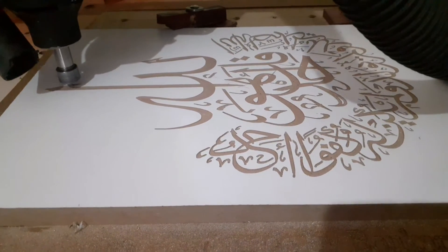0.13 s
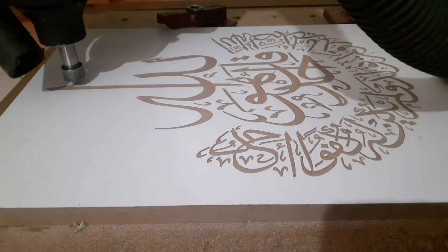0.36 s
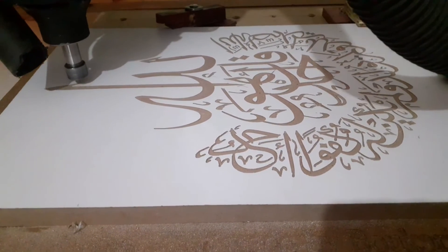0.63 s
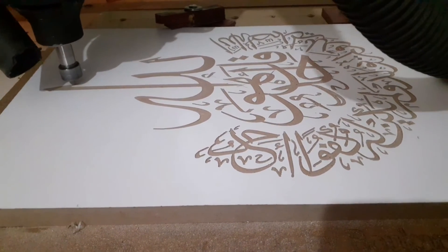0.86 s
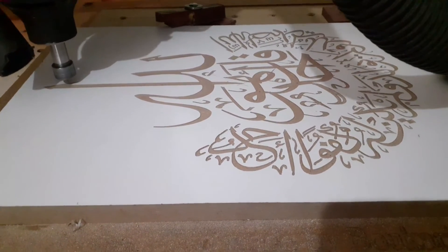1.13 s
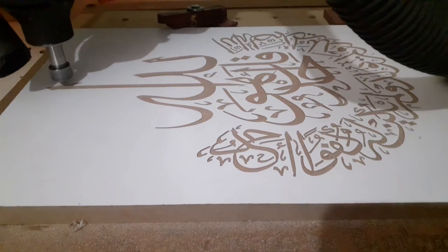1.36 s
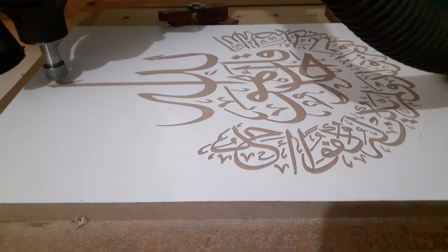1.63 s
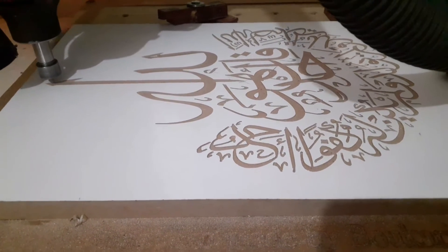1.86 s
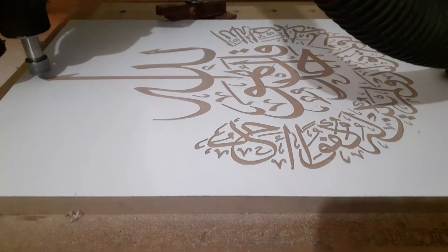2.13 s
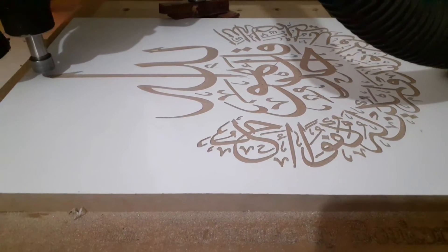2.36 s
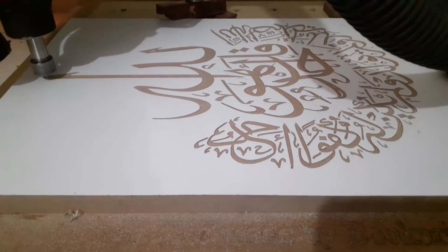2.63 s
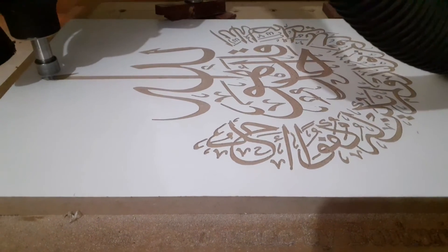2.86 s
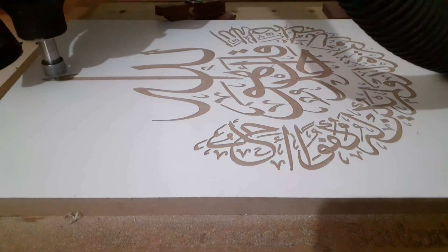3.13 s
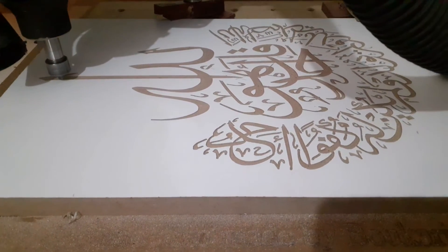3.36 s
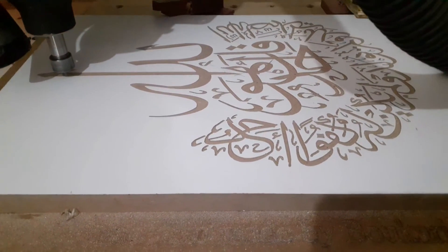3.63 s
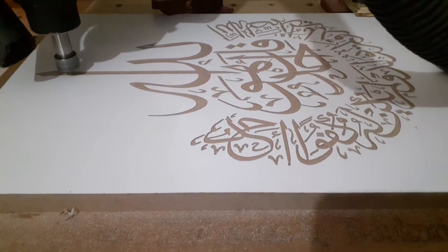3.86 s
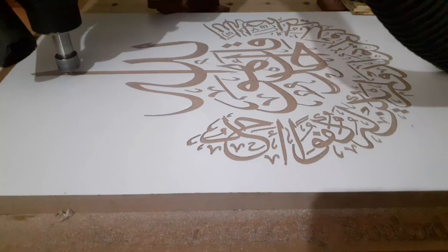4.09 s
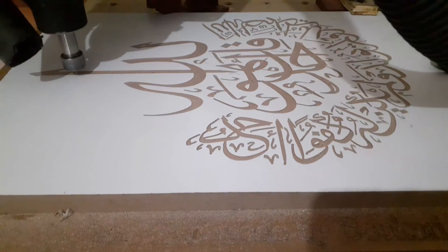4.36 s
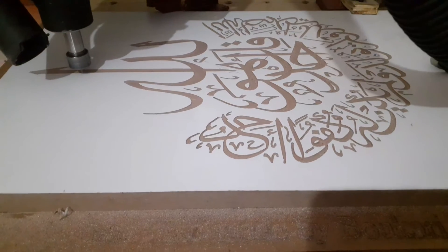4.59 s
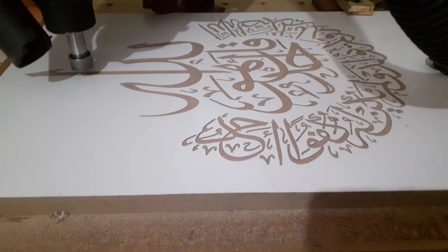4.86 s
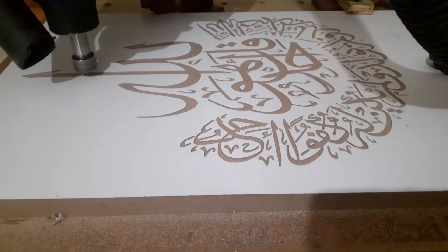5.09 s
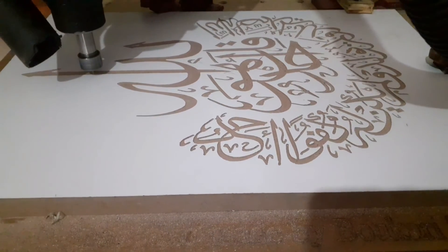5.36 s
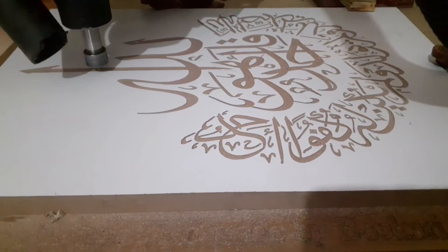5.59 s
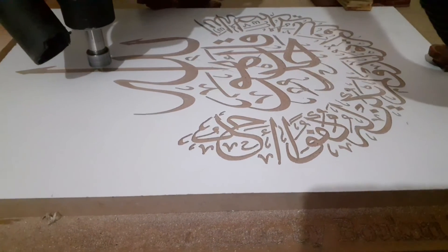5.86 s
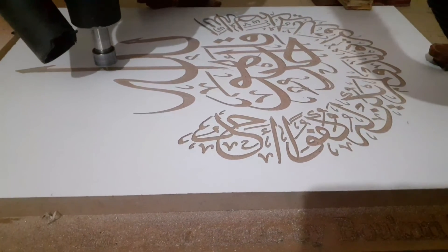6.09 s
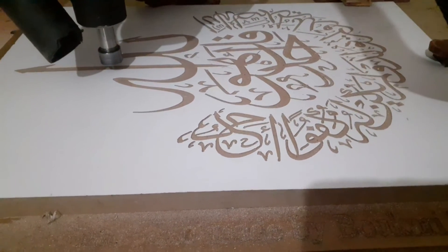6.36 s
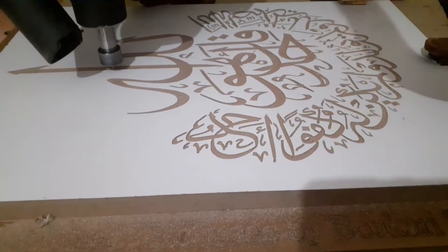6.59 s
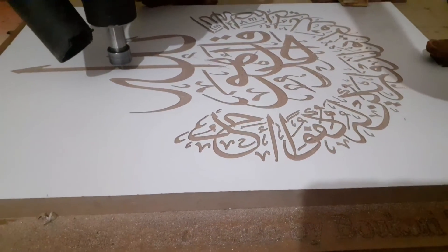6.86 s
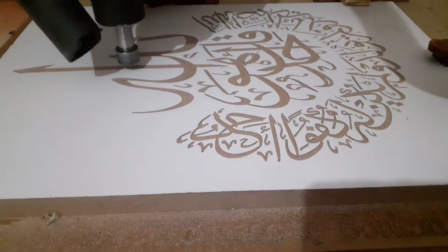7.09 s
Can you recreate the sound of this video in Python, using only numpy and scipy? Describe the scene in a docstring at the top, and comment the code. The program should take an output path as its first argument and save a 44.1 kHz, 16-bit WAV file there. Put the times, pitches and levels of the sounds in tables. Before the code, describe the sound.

Continuous workshop machine noise: a router motor's buzzing whine bends at corners while a vacuum's bright airflow and shrill motor tone never let up.

```python
"""A router cuts a wooden board in a small workshop while a dust extractor whines and rushes throughout.
In the first second the feed changes stroke often and the bit rounds two corners, bending the pitch of the cut.
Just after two seconds come two more corners and a short axis-motor hum; the router is fastest near 3.4 s,
then slows through longer strokes. Motors are sums of sines locked to shafts and bearings; air and hiss are
coloured noise. Two microphones a few centimetres apart hear it, the left one shaded in the treble."""
import sys
import numpy as np
from scipy import signal
from scipy.fft import rfft, irfft, next_fast_len
from scipy.io import wavfile
from scipy.ndimage import uniform_filter1d

SR = 44100
rng = np.random.default_rng(int(sys.argv[2]) if len(sys.argv) > 2 else 0)


def unload_audio(sound):
    """Save the sound as a 16-bit wav file, at the path given as the first command line argument."""
    columns = np.transpose(np.atleast_2d(sound))
    # keep every value between -1 and 1, then stretch to whole-number steps
    steps = np.round(np.clip(columns, -1, 1) * 32767)
    wavfile.write(sys.argv[1], SR, steps.astype(np.int16))


def to_linear_factor(level_db):
    """Convert decibel levels (scalar or array-like) to linear amplitude factors."""
    exponent = np.asarray(level_db, float) / 20
    return 10 ** exponent


N = 318402
STEP = 50  # samples between values of a slow control

# Slow drifts: the airflow follows the carriage, and the left of the hiss slowly rises and falls; each column is
# used only as a swing about its own mean. # Each row: time in seconds, left-right balance of the hiss in dB,
# airflow level in dB.
SLOW_DRIFTS = [(0, -7.5, -26.5), (2.5, -8, -26), (4, -7.5, -26), (5.5, -10, -25.5), (7.22, -9, -26)]
# Sharp corners, where the contact point runs round the bit and it digs in.
# Each row: middle in seconds, length in seconds, shift of the cutting rate in Hz, dB added to the first order.
CORNER_CUTS = [(0.157, 0.31, -4, -1), (0.595, 0.15, 4.5, 7), (2.188, 0.11, 4, -4), (2.274, 0.1, -3.5, 7)]


def in_time(rows):
    """Columns of a table, joined by straight lines, one value a sample."""
    s, *columns = np.transpose(rows)
    return [np.interp(np.arange(N) / SR, s, c) for c in columns]


def slow_chance(rate_hz):
    """Noise through two equal one-pole low-passes, scaled to spread 1; one value every STEP samples."""
    pole = np.exp(-2 * np.pi * STEP * rate_hz / SR)
    noise = rng.standard_normal(N // STEP + 1501)
    slow = signal.lfilter([1], [1, -2 * pole, pole * pole], noise)[1500:]  # drop the filter's run-in
    return slow / slow.std()


def fill_in(slow):
    """From one value every STEP samples to one a sample, held."""
    return np.repeat(slow, STEP, axis=-1)[..., :N]


def swell(middle_s, length_s):
    """A smooth rise and fall of height 1."""
    position = np.clip((np.arange(N) / SR - middle_s) / length_s, -.5, .5)
    return np.cos(np.pi * position) ** 2


def turns(speed):
    """Shaft angle in radians, the running sum of its speed in Hz."""
    return 2 * np.pi * np.cumsum(in_time(speed)[0]) / SR


def partial(angle, row, waver_db, waver_hz, sway_db=0):
    """One sine at both microphones; its level wavers apart in each as the reflections shift."""
    # The early, middle and late moments of the partials' levels, in seconds.
    level_times = [1.2, 3.6, 6.0]
    *level_db, left_db, lead = row
    control_s = np.arange(N // STEP + 1) * STEP / SR
    level_db = np.interp(control_s, level_times, level_db) + sway_db
    waver = waver_db * np.array([slow_chance(waver_hz), slow_chance(waver_hz)])
    both_db = level_db + waver + [[left_db], [0]]
    angle = angle + 2 * np.pi * rng.random()
    return fill_in(to_linear_factor(both_db)) * np.sin([angle + lead, angle])


def rushing(table, lag_s, modes, ripple_db, below_db, above_db):
    """Noise with a part shared by both microphones (late on the right) and a diffuse part of each one's own."""
    size = next_fast_len(N)
    hz = np.arange(size // 2 + 1) * SR / size + 1e-3
    at, *columns = np.transpose(table)
    right_db, left_db, alike = [np.interp(np.log(hz), np.log(at), c) for c in columns]
    # outside the table the level changes by so many dB an octave
    right_db += below_db * np.maximum(np.log2(at[0] / hz), 0)
    right_db += above_db * np.maximum(np.log2(hz / at[-1]), 0)
    colour_db = np.array([right_db + left_db, right_db])
    for centre_hz, width_hz, right, left in modes:
        colour_db += np.array([[left], [right]]) / (1 + (2 * (hz - centre_hz) / width_hz) ** 2)
    # wall reflections ripple the colour every few tens of hertz
    ripple = uniform_filter1d(rng.standard_normal(colour_db.shape), size=150)
    ripple = uniform_filter1d(ripple, size=150)
    colour_db += ripple_db * ripple / ripple.std()
    alike = np.clip(alike, 0, 1)
    shared, *own = rfft(rng.standard_normal((3, size))) * np.sqrt(SR / 2)  # unit power per Hz
    arrival = np.exp(-2j * np.pi * hz * [[0], [lag_s]])
    mixed = np.sqrt(alike) * shared * arrival + np.sqrt(1 - alike) * np.array(own)
    return irfft(to_linear_factor(colour_db) * mixed, size)[:, :N]


def steady_tones():
    """Mains hum and whines that hold their pitch while their levels waver."""
    # Hum and whines, mains hum first. Each row: pitch in Hz, right peak level early, middle and late
    # in dB before the trim below, left-right balance in dB, lead of the left in radians.
    tones = [(99.8, -56, -56, -55, 1, -0.1), (299.8, -45, -45, -44, -3, -0.4),
             (1327, -43, -42, -37, -8, 2.2), (2060, -47, -40, -35, -12, -0.2),
             (2766, -30, -32, -33, -14, -2.2), (2769, -38, -33, -33, -14, -1.4),
             (2915, -39, -41, -36, -9, 2.6), (3090, -43, -38, -41, -6, -0.2),
             (4119, -45, -42, -35, -17, -1.2), (4149, -39, -45, -45, -8, 2.9),
             (4367, -41, -47, -48, -12, -1.9), (5150, -43, -46, -41, -10, 0.9)]
    trim_db = -0.54
    t = np.arange(N) / SR
    return sum(partial(2 * np.pi * hz * t, row, 2.2, 1.4, trim_db) for hz, *row in tones)


def axis_motor():
    """An axis motor hums softly during one move: a single swelling sine, alike at both microphones."""
    # One move: start in seconds, length in seconds, pitch in Hz, peak level in dB.
    move = (2.33, .45, 366, -42)
    start, length, hz, peak_db = move
    envelope = np.sqrt(swell(start + length / 2, length))
    return to_linear_factor(peak_db) * envelope * np.sin(2 * np.pi * hz * np.arange(N) / SR)


def high_hiss():
    """High noise with a quick flicker in level; its left side slowly rises and falls."""
    # Spectrum of the hiss. Each row: frequency in Hz, right level in dB per Hz, left-right balance in dB #
    # about which it slowly swings, left-right likeness from 0 to 1.
    spectrum = [(10600, -75.3, -6.0, 0.62), (11300, -67.4, -12.7, 0.6), (12000, -64.2, -13.5, 0.72),
                (13000, -62.4, -13.2, 0.78), (14500, -63.2, -10.2, 0.8), (15300, -63.8, -8.8, 0.76),
                (15700, -63.3, -7.8, 0.72)]
    shift_db = in_time(SLOW_DRIFTS)[0]
    hiss = rushing(spectrum, 0, [], ripple_db=.3, below_db=-85, above_db=0)
    hiss *= fill_in(to_linear_factor(0.53 * slow_chance(8.6)))
    hiss[0] *= to_linear_factor(shift_db - shift_db.mean())
    return hiss


def airflow():
    """Rushing air, coloured by room, bench and hose, its level following the carriage."""
    # Spectrum of the air before the resonances. Each row: frequency in Hz, right level in dB per Hz,
    # left-right balance in dB, left-right likeness from 0 to 1.
    spectrum = [(35, -91, -0.2, 0.89), (70, -81, 0.5, 0.92), (130, -75.5, 1, 0.93), (200, -68.5, -1, 1),
                (344, -64.5, -2, 0.68), (535, -57, -1, 0.8), (850, -55.5, 0.5, 0.7),
                (1110, -53, -2.5, 0.67), (2190, -54, -4.5, 0.09), (3200, -54, -9, 0.27),
                (4600, -59.5, -6, 0.16), (5740, -56.5, -13, 0.12), (6320, -61.5, -15, 0.17),
                (7930, -68, -19.5, 0.23), (9900, -79.5, -24, 0)]
    # Peaks and dips of room, bench and hose. Each row: centre in Hz, width in Hz, right dB, left dB.
    resonances = [(55, 15, 3, 3), (153, 14, 10, 10), (221, 14, 8, 9), (251, 12, 11, 11), (292, 14, 3, 3),
                  (376, 23, 3, 0), (419, 25, -3, 1), (447, 44, 2, 4), (672, 62, -1, -3), (716, 37, 3, -1),
                  (789, 40, -2, 2), (897, 80, 4.5, 1), (978, 47, -1.5, 2), (1124, 53, -3, 1.5),
                  (1225, 57, 3, 0), (1306, 60, -2, -3), (1567, 71, -1, 3), (1745, 270, 1.5, 3),
                  (1984, 87, 2.5, 1.5), (2162, 94, -2, 0), (2595, 216, 0, 1.5), (2858, 122, -3, -1.5),
                  (3147, 134, 2.5, 0), (3985, 606, 2.5, 3), (4581, 191, -1.5, .7), (5100, 212, -1.5, 0),
                  (7188, 296, .3, 2)]
    air_db = in_time(SLOW_DRIFTS)[1]
    air = rushing(spectrum, 0.0002, resonances, ripple_db=1.0, below_db=-15, above_db=-130)  # lag in seconds
    return air * to_linear_factor(air_db - air_db.mean()) * fill_in(to_linear_factor(0.12 * slow_chance(3.4)))


def extractor_motor():
    """A steadier shaft with bearing whine; shaft, ball cage (3/8) and ball passes (35/8) mix in eighths."""
    # Shaft of the extractor. Each row: time in seconds, speed in Hz.
    shaft_speed = [(0.0, 392.87), (0.8, 392.56), (1.2, 392.48), (2.0, 392.42), (2.8, 392.61), (3.5, 393.06),
                   (4.0, 393.04), (4.8, 393.17), (6.0, 393.27), (6.4, 393.2), (7.22, 392.79)]
    # Its partials. Each row: order in eighths of a turn, right peak level early, middle and late in dB
    # before the waver, left-right balance in dB, lead of the left in radians.
    partials = [(3, -53, -53, -54, 1, -0.4), (8, -32, -31, -31, 0, -0.4), (35, -25, -26, -26, -9, 0.2),
                (43, -41, -41, -40, -3, 1.4), (62, -35, -37, -38, -4, 0.3), (70, -26, -25, -25, -14, 3.0),
                (75, -34, -33, -37, -18, 0.3), (78, -33, -31, -31, -21, 1.1), (89, -40, -44, -44, -9, -1.5),
                (97, -44, -46, -43, -12, -2.1), (105, -40, -38, -35, -19, 0.1),
                (108, -42, -48, -50, -21, 0.5), (113, -38, -43, -48, -13, 2.6),
                (121, -42, -41, -40, -28, -2.9), (137, -47, -49, -47, -21, -0.2),
                (140, -40, -44, -46, -24, -0.6), (145, -52, -51, -51, -18, 0.2),
                (148, -43, -40, -42, -18, -1.3), (159, -52, -54, -57, -26, -0.4),
                (175, -60, -55, -55, -31, -1.6), (180, -58, -59, -58, -19, 1.9),
                (183, -57, -57, -59, -20, 0.8), (188, -62, -57, -57, -23, -0.0),
                (191, -75, -56, -54, -27, 0.1), (196, -60, -67, -67, -23, -0.1)]
    eighth_angle = turns(shaft_speed) / 8
    return sum(partial(eighths * eighth_angle, row, .9, 1.5) for eighths, *row in partials)


def bite():
    """Level of each cut order in dB, held through a stroke and blended into the next, every STEP samples."""
    # Strokes of the feed, each meeting the wood from its own side.
    # Each row: start in seconds, dB added to the first, to the second and to the sixth order.
    strokes = [(0, 2.5, 2, -9), (.12, 1, -2, 8), (.24, -7, 0, 7), (.53, -0.5, -9, -8), (.72, 0.5, -1, 4),
               (2.22, 1, 0, -9), (2.76, -7, -7, 3), (2.97, 0.5, -6, -1), (3.4, -2.5, -1, 3),
               (5.15, -4, 0.8, -15), (6.95, -8, -3, -5)]
    blend_s = .05
    start, *held_db = np.transpose(strokes)
    stroke = np.searchsorted(start[1:], np.arange(N // STEP + 1) * STEP / SR)
    bite_db = uniform_filter1d(np.array(held_db)[:, stroke], size=int(blend_s * SR / STEP) + 1)
    dig_db = sum(db * swell(s, length) for s, length, _, db in CORNER_CUTS)
    bite_db[0] += np.append(dig_db, 0)[::STEP]
    return bite_db


def router():
    """Shaft orders, bearing passes and the commutator bars; the orders made in the cut follow the bite."""
    # Shaft of the router. Each row: time in seconds, speed in Hz before flutter and corners.
    shaft_speed = [(0.0, 445.53), (0.15, 445.72), (0.3, 446.87), (0.45, 447.46), (0.9, 447.46),
                   (1.5, 447.22), (2.3, 446.52), (2.8, 447.66), (3.1, 448.63), (3.4, 448.86), (3.7, 448.69),
                   (4.9, 446.83), (5.5, 446.28), (6.3, 446.25), (7.22, 446.93)]
    # Orders made in the cut, in cycles per shaft turn.
    cut_orders = (1, 2, 6)
    # Its partials. Each row: shaft turns, bearing passes, right peak level early, middle and late in dB
    # before bite and waver, left-right balance in dB, lead of the left in radians.
    partials = [(1, 0, -32, -32, -32.5, 2, 0.4), (2, 0, -28, -29, -31, -4, 1.0),
                (3, 0, -42, -33, -36, -7, 1.5), (0, 1, -35, -32.5, -33, 3, 1.4),
                (4, 0, -35, -32, -35, -4, 1.4), (5, 0, -39, -39, -38, -2, -2.8),
                (2, 1, -34, -33, -27, -7, 2.2), (6, 0, -38, -34, -39, -2, -0.4),
                (0, 2, -46, -43, -39, -8, 2.9), (0, 3, -42, -40, -41, -5, -0.7),
                (23, 0, -43, -46, -45, -1, -2.3), (8, 0, -39, -39, -40, -14, 2.9),
                (11, 0, -46, -44, -42, -5, -2.5), (12, 0, -44, -43, -42, -3, 1.0),
                (24, 0, -59, -56, -53, -8, 0.1), (-2, 1, -43, -45, -45, -11, 0.9),
                (1, 3, -47, -44, -46, -12, -2.7), (2, 3, -43, -44, -44, -13, 0.1)]
    passes_per_turn = 3.578
    # speed flutter, as shaft angle in radians, blurs the high orders
    flutter = uniform_filter1d(fill_in(0.012 * slow_chance(7.7)), size=STEP)
    angle = turns(shaft_speed) + flutter
    shift_hz = sum(hz * swell(s, length) for s, length, hz, _ in CORNER_CUTS)
    cut_angle = angle + 2 * np.pi * np.cumsum(shift_hz) / SR
    sway = dict(zip(cut_orders, bite()))
    out = 0
    for shaft, passes, *row in partials:
        order = shaft + passes * passes_per_turn
        if order in sway:
            out += partial(order * cut_angle, row, 0.57, 5.2, sway[order])
        else:
            out += partial(order * angle, row, 1.7, 2.0)
    return out


def scene():
    """Tones, hum, hiss, air and both motors together."""
    background = steady_tones() + axis_motor() + high_hiss() + airflow()
    return background + extractor_motor() + router()


def roll_off(x):
    """The treble ends steeply here."""
    return signal.sosfilt(signal.butter(12, 17070, fs=SR, output="sos"), x)


def record(dry):
    """Both channels end in a steep cut-off at the top of the treble."""
    cutoff_hz = 15760
    size = next_fast_len(N)
    passed = np.arange(size // 2 + 1) * SR / size < cutoff_hz
    mix = irfft(rfft(dry, size) * passed, size)[:, :N]
    return roll_off(mix)


dry = scene()
out = record(dry)
unload_audio(out)
```